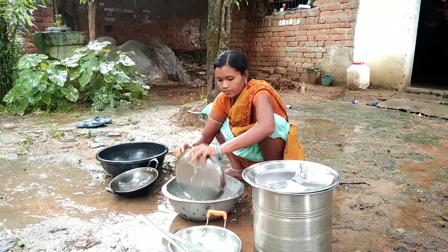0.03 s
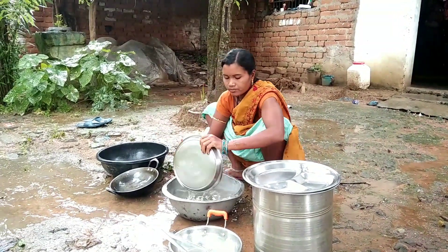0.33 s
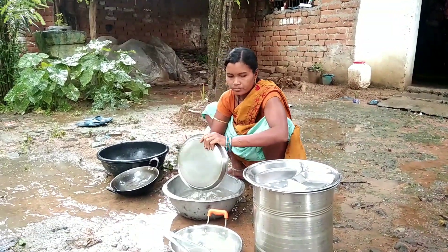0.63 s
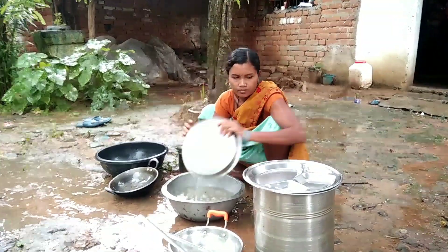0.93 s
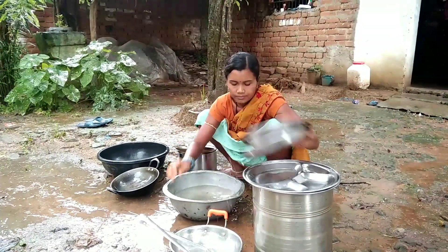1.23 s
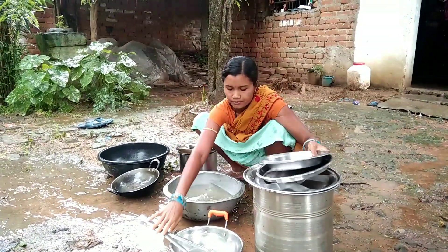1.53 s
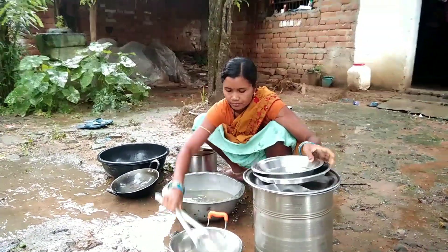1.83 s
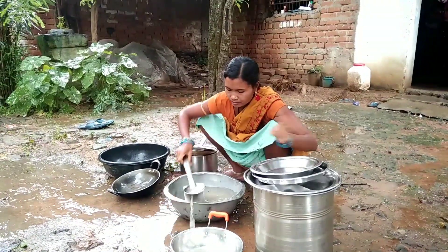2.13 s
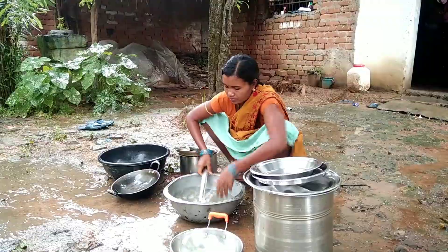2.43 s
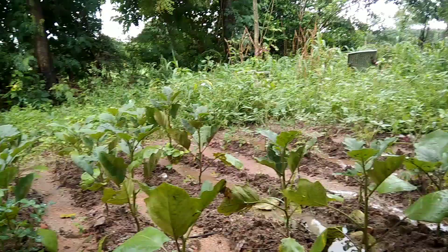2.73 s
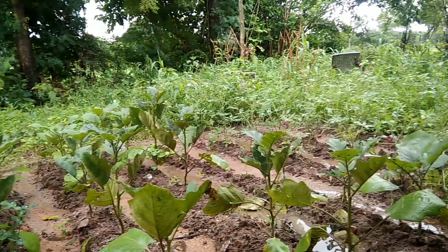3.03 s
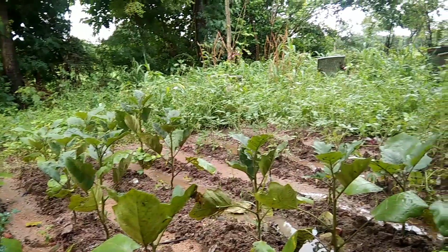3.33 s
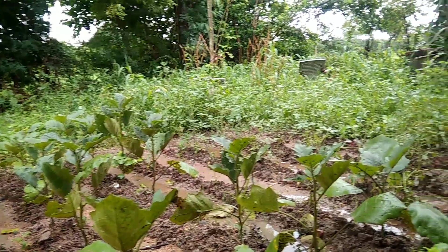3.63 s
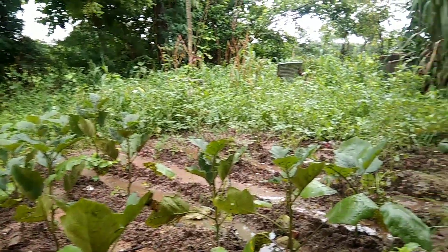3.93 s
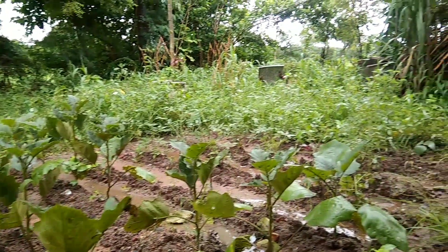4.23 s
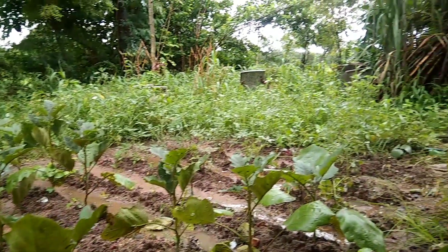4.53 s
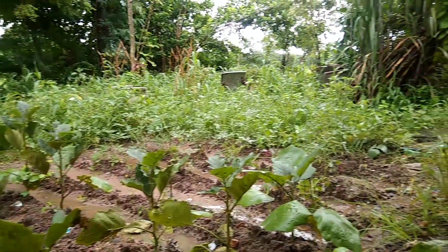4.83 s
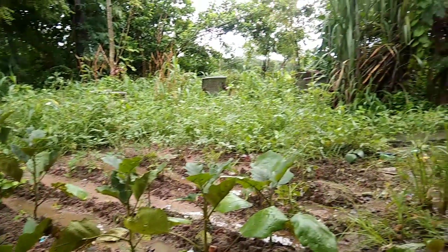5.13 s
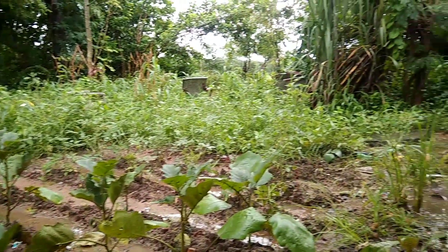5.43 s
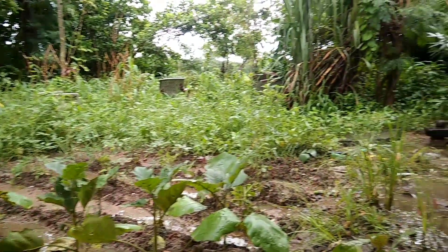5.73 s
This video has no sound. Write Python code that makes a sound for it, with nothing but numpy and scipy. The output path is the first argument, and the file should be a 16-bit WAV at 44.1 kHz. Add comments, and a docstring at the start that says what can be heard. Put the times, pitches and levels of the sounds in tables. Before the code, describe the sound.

Close by in a yard, a steel plate rings against a basin and clatters onto a stack, then a ladle clinks and scrapes. The ringing cuts off with a sharp click. Water sloshes and gulps a little to one side, followed by drips, soft leaf rustles and a few wet slaps. A small, distant bird twice sings a run of chirps over a soft outdoor hiss.

```python
"""Steel clanks, scrapes and clinks: someone is washing up in a yard.
A plate rings as it hits a basin and is stacked on a lidded drum; a ladle scrapes in the basin.
The steel rings until its sound cuts off abruptly with a sharp click.
Then water sloshes and trapped air gulps; drips, rustles and wet slaps follow.
Far off, over a soft outdoor hiss, a small bird twice sings a slowing, sinking run of chirps."""
import sys
import numpy as np
from scipy import signal
from scipy.fft import rfft, irfft, next_fast_len
from scipy.io import wavfile
from scipy.ndimage import map_coordinates

SR = 44100
rng = np.random.default_rng(int(sys.argv[2]) if len(sys.argv) > 2 else 0)


def master_out(mix):
    """Clip the mix to full scale and print it as 16-bit PCM to the path in sys.argv[1]."""
    frames = np.transpose(np.atleast_2d(mix))
    ceiling = np.clip(frames, -1, 1)
    pcm = np.round(ceiling * 32767).astype(np.int16)
    wavfile.write(sys.argv[1], SR, pcm)


N = 259308

SPLIT_HZ, TOP_HZ = 3860, 14600  # where the treble begins and ends
CONTACT_S = 0.0005  # time a blow takes to set the steel ringing
# tone of spraying water and wet leaves: (frequency [Hz], level [dB])
SPRAY = [(88, -44), (150, -38.5), (320, -15), (433, -17.5), (620, -15), (1010, -19), (1370, -21.5),
         (2120, -5), (2820, -14.5), (4300, -8), (5670, -16.5), (7500, -4), (13800, -18)]


def amp(db):
    """Turn decibels into a gain; amp(-60 * t / t60) fades by 60 dB in t60 seconds."""
    return 10 ** (np.asarray(db) / 20)


def unit(x):
    """Scale a sound to an average (rms) strength of 1."""
    return x / np.sqrt(np.mean(x ** 2) + 1e-20)


def colour(points, hz):
    """Read the gain at hz from a tone curve of (frequency [Hz], level [dB]) points."""
    freqs, db = np.transpose(points)
    return amp(np.interp(np.log(hz + 1), np.log(freqs + 1), db))


def filtered(x, response):
    """Multiply each frequency in x by response(hz)."""
    n = x.shape[-1]
    padded = next_fast_len(n + 8192)
    return irfft(rfft(x, padded) * response(np.fft.rfftfreq(padded, 1 / SR)), padded)[..., :n]


def toned(x, tone):
    """Give x a tone curve, at strength 1."""
    return unit(filtered(x, lambda hz: colour(tone, hz)))


def body_and_treble(x, tone):
    """Give x a tone curve and split it into a low and a high part, each at strength 1."""
    low = lambda hz: 1 / (1 + (hz / SPLIT_HZ) ** 12)
    body = filtered(x, lambda hz: colour(tone, hz) * low(hz))
    treble = filtered(x, lambda hz: colour(tone, hz) * (1 - low(hz)))
    return np.array([unit(body), unit(treble)])


def add(track, s, sound):
    """Mix a sound into the track, starting at s seconds."""
    part = track[:, max(round(s * SR), 0):][:, :sound.shape[-1]]
    part += sound[..., :part.shape[-1]]


def wobble(rate):
    """A smooth curve through `rate` random values a second."""
    knots = rng.standard_normal(int(N * rate / SR) + 4)
    return map_coordinates(knots, [np.arange(N) * rate / SR])


def noise(n, spread):
    """Stereo noise: left and right are alike in the bass, partly unrelated in the treble."""
    mid, side = rng.standard_normal((2, n))
    side = spread * filtered(side, lambda hz: (hz + 400) / (hz + 1500))
    return unit(np.array([mid + side, mid - side]))


def aside(x, lag_ms):
    """Sound from one side reaches the left channel before the right."""
    return filtered(x, lambda hz: np.exp(1j * np.pi * hz * lag_ms / 1000 * np.array([[1], [-1]])))


def resonances(x, width_hz, depth_db):
    """Many close resonances lift and lower narrow bands, a little differently left and right."""
    left, right, shared = rng.standard_normal((3, int(SR / width_hz)))
    curves = shared + .5 * left, shared + .5 * right
    ripple = lambda hz: np.array([map_coordinates(curve, [hz / width_hz]) for curve in curves])
    return filtered(x, lambda hz: amp(depth_db * ripple(hz)))


def yard_echoes(x, t60):
    """Walls and trees scatter the sound back as a fading tail."""
    t = np.arange(SR // 2) / SR
    tail = rng.standard_normal((2, len(t))) * amp(-60 * t / t60)
    return signal.fftconvolve(x, tail / np.linalg.norm(tail[0]), axes=1)[:, :N]


def air():
    """A soft, slightly restless outdoor hiss."""
    # tone of the hiss: (frequency [Hz], level [dB])
    tone = [(30, -16), (108, -9), (1440, -7), (2180, -0.5), (2740, -5.5), (4130, 2), (5340, -9),
            (6390, -3.5), (8700, -0.5), (13800, -18.5)]
    # its slow rise and fall: (time [s], level [dB])
    loudness = [(.6, -45.5), (1.1, -46), (2.25, -43.5), (4.15, -48.5), (5.0, -46.5), (5.85, -40.5)]
    level = amp(np.interp(np.arange(N) / SR, *np.transpose(loudness)) + wobble(16))
    hiss = toned(noise(N, 1.0) * amp(1.9 * wobble(300)), tone)
    return aside(level * hiss, lag_ms=0.428)


def chirp_run(start, hz, db, count=12, first_gap_s=.051, gap_growth=1.072, sink_oct_per_s=0.2305):
    """A run that slows, sinks and swells, as rows of (time [s], pitch [Hz], level [dB])."""
    age = first_gap_s * np.append(0, np.cumsum(gap_growth ** np.arange(count - 1)))
    soft_start_db = 4 * np.exp(-age / 0.078)
    return np.column_stack([start + age, hz * 2 ** (-sink_oct_per_s * age), db - soft_start_db])


def bird(chirp_s=0.0384):
    """Each chirp is a quick, raspy whistle that arches up and back down."""
    # runs of chirps: (start [s], first pitch [Hz], level [dB])
    songs = [(0.371, 4250, -46.5), (3.242, 4106, -43)]
    # a chirp on its own: (time [s], pitch [Hz], level [dB])
    lone_chirps = [(4.675, 3580, -47)]
    out, t = np.zeros((2, N)), np.arange(SR // 10) / SR
    arch = np.sin(np.pi * np.minimum(t / chirp_s, 1))
    for s, hz, db in np.vstack([chirp_run(*song) for song in songs] + [lone_chirps]):
        rasp = .08 * (hz / 4000) ** 2 * wobble(700)[:len(t)]
        pitch = hz * 2 ** (.15 * (arch - .8) + rasp)
        add(out, s - .014, amp(db) * arch ** 2 * np.sin(2 * np.pi * np.cumsum(pitch) / SR))
    return out


def rustles():
    """Wet leaves brush past in soft, uneven swishes."""
    # brushes of the leaves: (time [s], level [dB], length [s])
    brushes = [(4.41, -42, 0.19), (4.67, -45.5, .14), (5.701, -36.5, 0.092)]
    out = np.zeros((2, N))
    for s, db, length in brushes:
        n = int(length * SR)
        _, swish = body_and_treble(noise(n, 1) * amp(4.3 * wobble(250))[:n], SPRAY)
        add(out, s, amp(db) * swish * np.sqrt(np.hanning(n)))
    return out


def drips(t60=0.049, patter_from_s=3.8, count=50):
    """Single drops tick, each with its own tone; after the sloshing, fainter ones patter ever faster."""
    # the nearest drops: (time [s], level [dB])
    near_drops = [(.533, -34), (3.343, -28.5), (3.632, -26.5), (3.739, -36), (4.423, -28.5)]
    # tone of a drop landing: (frequency [Hz], level [dB])
    tone = [(700, -24), (2100, 2.5), (3000, -5), (4200, -2.5), (5500, -13), (8000, -5), (13800, -17)]
    out, t = np.zeros((2, N)), np.arange(SR // 10) / SR
    jitter, faintness = rng.random((count, 2)).T
    times = patter_from_s + (N / SR - patter_from_s) * np.sqrt((np.arange(count) + jitter) / count)
    patter = np.column_stack([times, -35 - 9.5 * faintness])
    for s, db in np.vstack([near_drops, patter]):
        tick = resonances(noise(len(t), .7), width_hz=350, depth_db=5)
        add(out, s, toned(tick, tone) * amp(db - 60 * t / t60))
    return aside(out, lag_ms=0.458)


def slaps(body_t60=0.087, treble_t60=0.059):
    """Water and mud smack in short, grainy bursts; heavier things land with a dull bump."""
    # wet smacks: (time [s], level [dB], treble boost [dB])
    smacks = [(3.88, -42.5, 13.5), (4.407, -42, 14), (5.078, -34, -3.5), (5.293, -18, -9),
              (5.431, -27, -3.5), (5.557, -27, -16), (5.649, -32.5, -4.5), (5.698, -38.5, 11),
              (5.709, -36, 15), (5.756, -38.5, 10.5)]
    # heavy landings: (time [s], level [dB], fade time [s])
    thuds = [(1.835, -37.5, 0.25), (2.728, -38, 0.11), (3.85, -41.5, 0.18)]
    # tones of a smack and of a thud: (frequency [Hz], level [dB])
    smack_tone = [(88, -60), (150, -32), (1110, -12.5), (1320, -16.5), (1660, -9.5), (8440, -11),
                  (13800, -25)]
    thud_tone = [(50, -46), (130, -11.0), (300, -17.5), (750, -19.0), (1600, -35)]
    out, t = np.zeros((2, N)), np.arange(SR // 3) / SR
    for s, db, treble_db in smacks:
        # the level jumps about once a millisecond
        grains = np.repeat(amp(3.5 * rng.standard_normal(len(t))), SR // 1000)[:len(t)]
        body, treble = body_and_treble(noise(len(t), 0.79) * grains, smack_tone)
        smack = body * amp(-60 * t / body_t60) + treble * amp(treble_db - 60 * t / treble_t60)
        add(out, s, smack * amp(db) * (1 - np.exp(-t / 0.00081)))
    for s, db, t60 in thuds:
        bump = toned(noise(len(t), 0.71), thud_tone)
        add(out, s, bump * amp(db - 60 * t / t60) * (1 - np.exp(-t / 0.00035)))
    return aside(out, lag_ms=0.467)


def bubble(hz, db, glide_oct_per_s, waver_oct):
    """Trapped air rings at a gliding, unsteady pitch; bigger, lower bubbles ring longer."""
    t = np.arange(SR // 3) / SR
    t60 = 0.092 * np.sqrt(1000 / hz)
    pitch = hz * 2 ** (glide_oct_per_s * t + waver_oct * wobble(106)[:len(t)])
    level = amp(db - 60 * t / t60) * (1 - np.exp(-t / 0.0024))
    return level * np.sin(2 * np.pi * np.cumsum(pitch) / SR)


def bubbles(climb_oct_per_s=3.5):
    """Big air pockets gulp and sink in pitch; small bubbles climb in pitch as they near the surface."""
    # pockets of air under the sloshes: (time [s], pitch [Hz], level [dB])
    gulps = [(2.641, 345, -27.5), (2.642, 604, -33.5), (2.73, 388, -27.5), (2.748, 361, -31.5),
             (2.891, 343, -33.5), (2.927, 339, -28), (2.992, 310, -29), (3.008, 316.6, -20),
             (3.056, 293, -31), (3.098, 326, -36.5)]
    # small bubbles: (time [s], pitch [Hz], level [dB])
    plips = [(.47, 1486, -35), (.774, 1366, -38.5), (.88, 600, -38.5), (3.884, 743, -37),
             (5.23, 358, -41.5), (5.712, 715, -33.5), (5.745, 573, -39.5)]
    out = np.zeros((2, N))
    for s, hz, db in gulps:
        add(out, s, bubble(hz, db, glide_oct_per_s=-0.48, waver_oct=0.052))
    for s, hz, db in plips:
        add(out, s, bubble(hz, db, climb_oct_per_s, waver_oct=0.093))
        for when, octaves in rng.uniform(-1, 1, (4, 2)):  # four fainter bubbles around each one
            splatter = bubble(hz * 2 ** (octaves + .5), db - 12, climb_oct_per_s, waver_oct=.15)
            add(out, s + .07 * when, splatter)
    return out


def sloshes(treble_db=6, brighten=0.15, lead_s=.5):
    """Water swells and collapses into spray; each slosh rings the vessel anew, brighter when faster."""
    # sheets of water: (peak time [s], level [dB], rise time [s], fade time [s])
    sheets = [(2.647, -21.5, 0.031, 0.51), (2.735, -25.5, 0.0078, 0.53), (2.79, -27.5, 0.27, 0.34),
              (3.008, -13, 0.32, 0.43)]
    out, t = np.zeros((2, N)), np.arange(SR) / SR - lead_s
    for s, db, rise, fall in sheets:
        flow = amp(-60 * np.maximum(-t / rise, t / fall))
        droplets = noise(SR, 0.99) * amp(2.5 * wobble(900) + 1.5 * wobble(70.4))[:SR]
        body, treble = body_and_treble(resonances(droplets, width_hz=120, depth_db=3.8), SPRAY)
        splash = (body + amp(treble_db) * flow ** brighten * treble) / np.hypot(1, amp(treble_db))
        add(out, s - lead_s, amp(db) * flow * splash)
    return aside(out, lag_ms=0.449)


def contact(tone, treble_db, crack_db, t60, count=330):
    """One touch on steel gives a crack and rings its own random set of weak notes."""
    n = SR // 2
    t, weak_notes = np.arange(n) / SR, np.zeros(n // 2 + 1)
    pitches = (np.arange(count) + rng.random(count)) / count * TOP_HZ
    weak_notes[(pitches * n / SR).astype(int)] = 1  # only these frequencies of the noise get through
    ringing = resonances(irfft(rfft(noise(n, .95)) * weak_notes), width_hz=150, depth_db=5.5)
    ringing = body_and_treble(ringing, tone) * amp(-60 * t / t60)
    crack = body_and_treble(noise(n, 1.0), tone) * amp(crack_db - 60 * t / 0.041)
    body, treble = ringing + crack
    return (body + amp(treble_db) * treble) * (1 - np.exp(-t / CONTACT_S)) / np.hypot(1, amp(treble_db))


def steel(hits, notes, tone, notes_db, crack_db, scrape_db, t60, grip_detune=0.00488, touch_s=0.03):
    """A blow rings the steel's strong notes, bent by the grip; the rim then chatters as it slides."""
    out, t = np.zeros((2, N)), np.arange(SR) / SR
    onset = 1 - np.exp(-t / CONTACT_S)
    for s, db, treble_db, slide in hits:
        add(out, s, amp(db) * contact(tone, treble_db, crack_db, t60))
        for hz, level, fade_s in notes:
            phase = rng.uniform(0, 2 * np.pi) + rng.normal(0, 0.51, (2, 1))
            pitch = hz * (1 + grip_detune * rng.normal())
            share = (amp(treble_db) if hz > SPLIT_HZ else 1) / np.hypot(1, amp(treble_db))
            ring = amp(db + notes_db + level + rng.normal(0, 2.07) - 60 * t / fade_s) * onset
            add(out, s, share * ring * np.sin(2 * np.pi * pitch * t + phase))
        # the rim moves from point to point, tapping eight times at each, so the weak notes keep shifting
        for start in np.arange(0, slide, touch_s):
            length = min(touch_s, slide - start)
            taps = np.bincount((rng.random(8) * length * SR).astype(int), rng.standard_normal(8))
            chatter = amp(scrape_db) * np.sqrt(length) * taps / np.linalg.norm(taps)
            touch = contact(tone, treble_db, crack_db, t60)
            add(out, s + start, signal.fftconvolve(touch, chatter[None], axes=1))
    return out


def dishes(cutoff_s=2.5175):
    """Struck plate, stack, ladle and basin ring until the sound cuts off abruptly with a sharp click."""
    # blows on each piece: (time [s], level [dB], treble boost [dB], length of the slide after it [s])
    plate_hits = [(.0305, -19.5, -4, 0.075), (.258, -36, -4.5, 0.003)]
    stack_hits = [(1.254, -23.5, 3.5, 0.021), (1.276, -17.5, -6, 0.017), (1.326, -29, -13, 0.012),
                  (1.459, -32.5, 4, 0.054), (1.508, -30, -4, .008), (1.524, -18.5, -0.5, 0.05),
                  (1.587, -27, 10, .012), (1.726, -23, -2, 0.0057)]
    ladle_hits = [(1.637, -15, 11.5, 0.0013), (1.755, -23, 14, 0.032), (1.781, -23, 19, 0.026),
                  (1.81, -26.5, 10.5, 0.031), (1.888, -24, 12, 0.0034), (1.904, -17.5, 23, 0.042),
                  (1.943, -18.5, 19, 0.013), (2.097, -20, 4, 0.0056), (2.106, -16, 12.5, 0.021)]
    basin_hits = [(2.432, -22, 3.4, 0.015), (2.446, -20.5, 8.3, 0.013), (2.458, -19, 8, 0.031)]
    # the strongest notes each piece rings at: (pitch [Hz], level [dB], fade time [s])
    plate = [(450.3, -13, 0.55), (482.7, -18.5, 1.8), (803, -11, 0.6), (1102, -4, 0.42), (1517, 21, 0.026),
             (1572, -5, 0.46), (2282, 20, 0.033), (2510, -2.5, 0.43)]
    stack = [(794, -1, 0.34), (846, -1.5, 0.26), (1930, 4.5, 0.098)]
    ladle = [(1610, -2.5, 0.12), (4420, 1, 0.15)]
    basin = [(572, 2, 0.04), (2062, 0, 0.22), (6060, -0.5, 0.16), (6670, 3, 0.13)]
    # tones of the many weaker notes, and of the click: (frequency [Hz], level [dB])
    plate_tone = [(71, -64), (140, -27.5), (450, -17.5), (1000, -5), (1680, -6), (2650, -1.5),
                  (3450, -15.5), (4400, -10.5), (8400, -12.5), (13800, -30)]
    stack_tone = [(60, -48), (105, -8), (300, -14), (550, -18), (771, -1.5), (1400, -5), (2100, 0),
                  (5020, -8.5), (9250, -3.5), (13800, -22)]
    ladle_tone = [(59, -56), (100, -34), (330, -16), (1520, -6.5), (2200, 0.5), (3200, -8.5), (4450, -6.5),
                  (5500, -12.5), (7500, -7), (8800, 2), (11000, -13), (13800, -16)]
    click_tone = [(80, -35), (1000, -18), (1900, 0.0), (3200, -19.5), (7000, -7.5), (14000, -23.5)]
    out = steel(plate_hits, plate, plate_tone, notes_db=-5.5, crack_db=4.5, scrape_db=-14.0, t60=0.44)
    out += steel(stack_hits, stack, stack_tone, notes_db=-8.5, crack_db=3.0, scrape_db=-10.5, t60=0.3)
    out += steel(ladle_hits, ladle, ladle_tone, notes_db=-7.5, crack_db=-5.0, scrape_db=-5.5, t60=0.2)
    out += steel(basin_hits, basin, ladle_tone, notes_db=-2.5, crack_db=-7.0, scrape_db=-4.5, t60=0.24)
    since_cutoff = np.maximum(np.arange(N) / SR - cutoff_s, 0)
    click = toned(noise(N, 0.99), click_tone) * amp(-6.0 - 60 * since_cutoff / 0.018) * (since_cutoff > 0)
    return out * amp(-60 * since_cutoff / 0.015) + click


def scene():
    """Dishes close by, water to one side, the bird far off and heard mostly through its echoes."""
    wet = sloshes() + bubbles() + slaps() + drips() + rustles()
    song = bird()
    far_song = song + amp(7.5) * yard_echoes(song, t60=0.24)
    return dishes() + wet + amp(-6) * yard_echoes(wet, t60=0.27) + far_song + air()


def record(dry, low_cut_hz=75, ceiling=.85):
    """The left gets more bass, the right more middle; peaks are rounded, rumble and top treble cut."""
    # boost on the left, equal cut on the right: (frequency [Hz], level [dB])
    balance = [(30, -2.0), (80, 8.5), (330, 6.0), (500, 0.5), (2000, -1.5), (11000, 0.6)]
    lean = lambda hz: np.array([colour(balance, hz), 1 / colour(balance, hz)])
    channels = filtered(dry, lambda hz: lean(hz) * hz ** 2 / np.hypot(hz ** 2, low_cut_hz ** 2))
    rounded = channels / (1 + (channels / ceiling) ** 4) ** .25
    return filtered(rounded, lambda hz: hz < TOP_HZ)


dry = scene()
out = record(dry)
master_out(out)
```